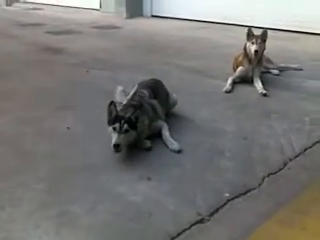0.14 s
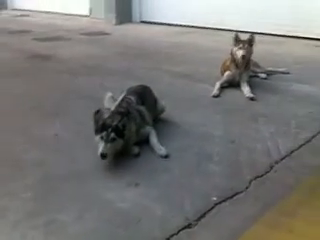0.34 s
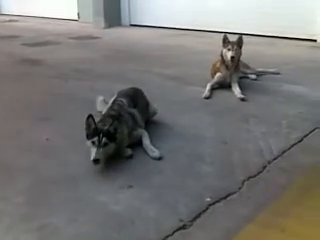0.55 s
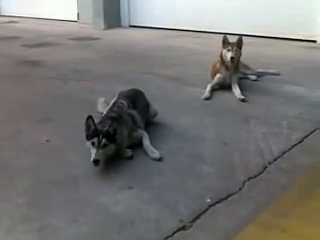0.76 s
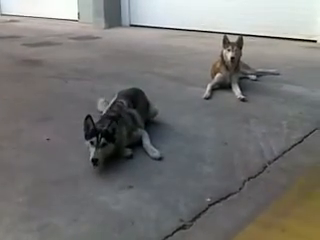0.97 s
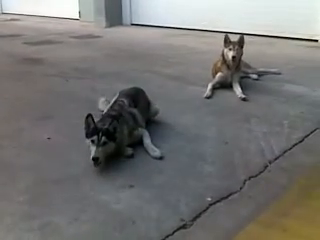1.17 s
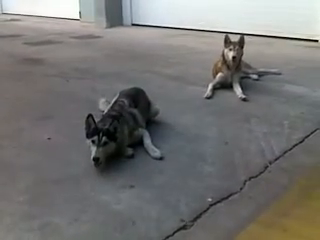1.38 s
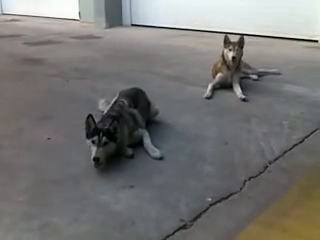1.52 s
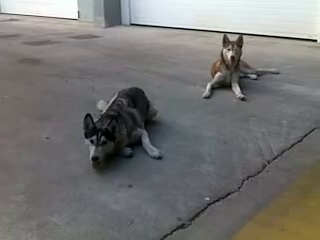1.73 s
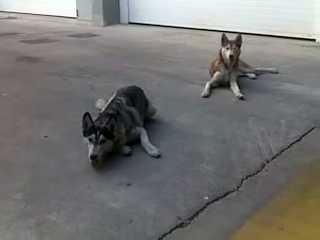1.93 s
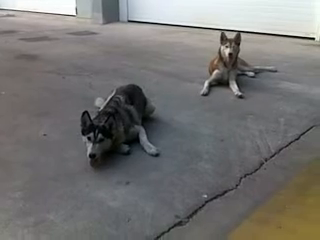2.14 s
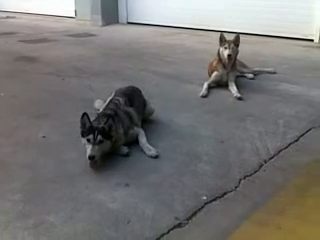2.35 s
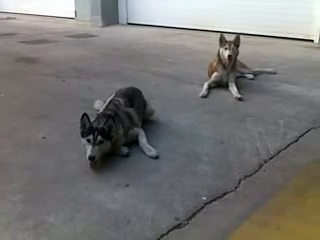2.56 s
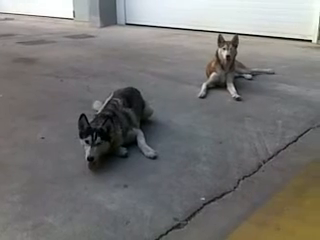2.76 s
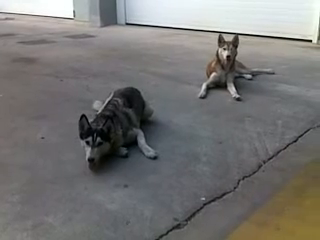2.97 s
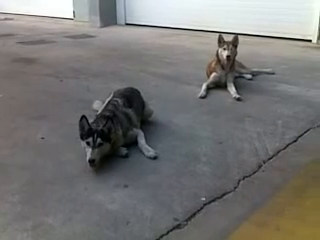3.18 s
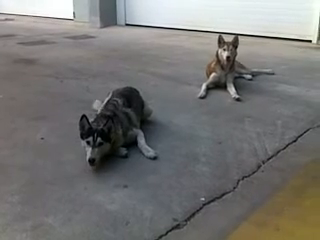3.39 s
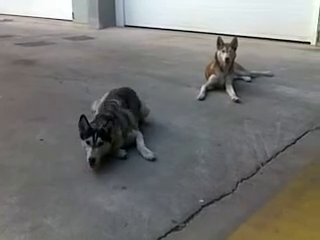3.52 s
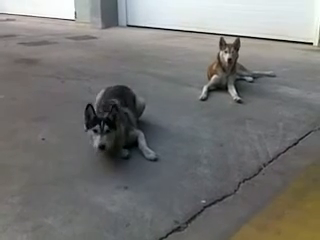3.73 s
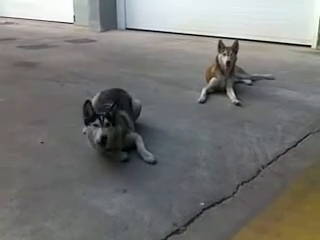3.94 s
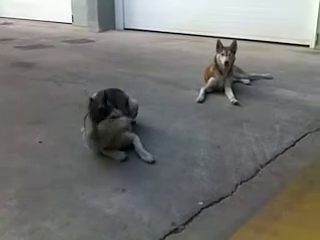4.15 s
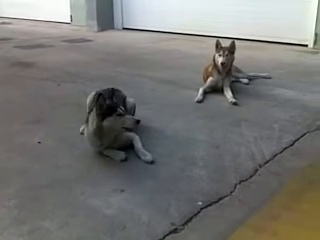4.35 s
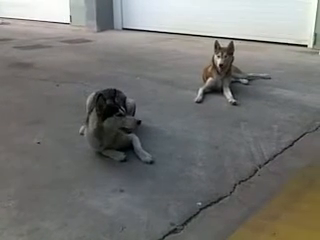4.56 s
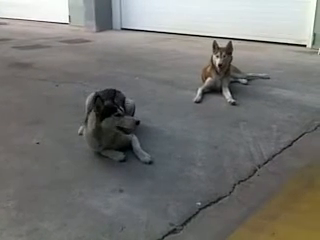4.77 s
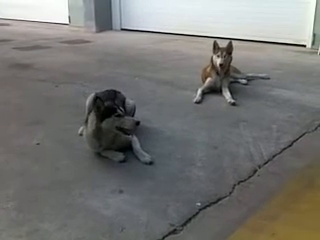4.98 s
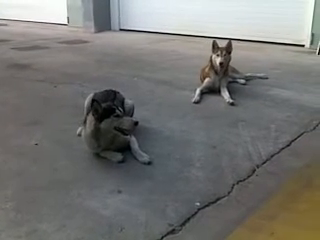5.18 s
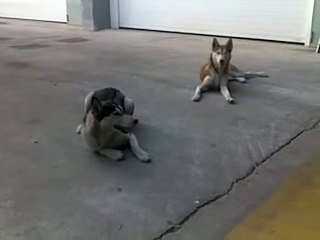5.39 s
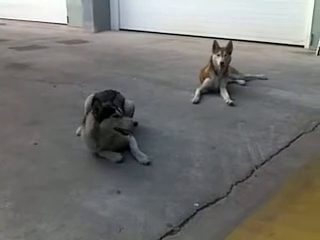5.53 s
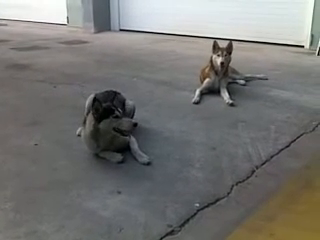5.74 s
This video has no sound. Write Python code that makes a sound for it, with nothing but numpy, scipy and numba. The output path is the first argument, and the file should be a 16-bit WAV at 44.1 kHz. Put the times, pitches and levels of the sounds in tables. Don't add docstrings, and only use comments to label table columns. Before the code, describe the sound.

Phone-quality sound of two husky-like dogs in a walled concrete yard: constant midrange motor hum with airy hiss, a single short bright yelp near the start, a long pause, then a rough, breathy bark with rumbling, fizzing distortion running straight into a brief arched yelp. Doors throw back quick slaps and about a second of tail; background dips slightly after barks.

```python
import sys
import numpy as np
from scipy import signal
from scipy.fft import rfft, irfft, next_fast_len
from scipy.io import wavfile
from scipy.ndimage import uniform_filter1d
from numba import njit

SR = 44100
rng = np.random.default_rng(int(sys.argv[2]) if len(sys.argv) > 2 else 0)


def store_wav(level_fs):
    pcm = np.round(np.clip(np.atleast_2d(level_fs), -1, 1) * 32767)
    wavfile.write(sys.argv[1], SR, pcm.T.astype(np.int16))


def volts(x):
    e = np.asarray(x, float) / 20
    return 10 ** e


N = 256220

# f/Hz, level/dB (density)
HISS = [(413, -12.5), (477, -11), (634, -15.5), (1010, -16), (1400, -19), (2150, -26.5), (3160, -26),
        (3570, -32.5)]
# f/Hz, level/dB
HISS_EDGES = [(18, -63.5), (30, -33), (138, -24.5), (203, -9), (413, 0), (3570, 0), (3870, -15),
              (5030, -60)]
HISS_DB = -32
# f/Hz, level/dB
HUM = [(339, -41.5), (475.7, -28.5), (523.6, -36.5), (716.3, -45.5), (977, -46), (1025, -47),
       (1379.5, -42.5), (1428, -49), (1572, -56.5), (1809, -54.5), (1879, -51), (2444, -56.5), (3090, -56)]

# t/s, level/dB (effort), f/Hz (pitch)
YELP = [
    (.52, -35.5, 251.3),
    (.553, -15.5, 295.2),
    (.612, -6.5, 418.3),
    (.632, -8, 451.7),
    (.65, -5.5, 469.5),
    (.674, -4.5, 455.6),
    (.686, -18, 410),
    (.701, -12, 341),
    (.722, -21, 285),
]
HOARSE = [
    (3.62, -28, 281),
    (3.627, -18, 309.5),
    (3.657, -16, 515.6),
    (3.688, -13, 543.8),
    (3.71, -15.5, 608.4),
    (3.8, -10.5, 595),
    (3.92, -9, 563.6),
    (3.985, -25.5, 541.5),
    (4.05, -18, 552),
]
ARCH = [
    (4.055, -23.5, 337.8),
    (4.085, -17.5, 398.4),
    (4.11, -20, 428.7),
    (4.14, -13, 462.7),
    (4.165, -17, 435.6),
    (4.2, -20.5, 335.1),
    (4.22, -24.5, 319.5),
    (4.28, -25, 269.8),
    (4.32, -28.5, 302),
]
# f/Hz, width/Hz, level/dB
CLEAR_THROAT = [(410, 110, 4), (644, 160, 4), (918, 110, 3.5), (1180, 330, -2.5), (1801, 290, -5.5),
                (2207, 190, -9.5), (2650, 600, -21.5)]
HOARSE_THROAT = [(585, 270, 0), (870, 230, -3), (1290, 350, -4), (1860, 320, -4), (2170, 260, -6),
                 (2600, 300, -10)]
ARCH_THROAT = [(446, 190, 1.5), (684, 190, 0.5), (916, 130, 4.5), (1253, 190, -4), (1779, 360, 1),
               (2420, 240, -11), (2765, 430, -9.5)]
SHUT_HZ, OPEN_HZ = 285, 328
CALM_ROUGH, SOFT_ROUGH, HOARSE_ROUGH = .04, .12, .35
STRAIN_HZ, BROKEN_HZ, BROKEN_ROUGH = 520, 595, .88
ROUGH_BRIGHT_DB_PER_OCT = 5.5
VOICE_TOP_HZ, PUFF_LOW_HZ, PUFF_HIGH_HZ = 3050, 480, 5000

# f/Hz, t60/s
YARD = [(200, 0.41), (500, 1), (1000, 0.99), (2000, 0.94), (3500, 0.94)]
# delay/s, level/dB
WALLS = [
    (.012, -8.5),
    (.035, -5),
    (.075, -17.5),
    (.1, -13.5),
    (0.149, -20),
    (.23, -24),
]
# f/Hz, level/dB
YARD_COLOUR = [(250, -6), (460, -1), (930, -4.5), (1400, -0.5), (1900, 0), (2400, 0.5), (3200, 2)]

# t/s, level/dB
NUDGES = [
    (.615, -36),
    (4.132, -35),
]
NUDGE_S, NUDGE_HZ = .012, 150
RASP_S, RASP_HZ, RASP_WIDTH_HZ, RASP_DB = .033, 2340, 700, -14.5
BLAST_AT_S, SWELL_S, HOLD_S, DIE_S, SWELL_DB = 3.62, .04, .22, .17, -19.5
RUMBLE_DB, RUMBLE_DB_PER_S, RUMBLE_DIE_DB = -19.5, -26, -36
FIZZ_DB, FIZZ_DB_PER_S, FIZZ_DIE_DB = -26.5, 21.5, -21.5

PHONE_HZ = 8000
# f/Hz, level/dB
BAND = [(3000, 0.5), (3600, 1), (4000, 1.5), (4350, -58), (5000, -84)]
# f/Hz, level/dB
MIRRORS = [
    [(4200, -61), (5000, -60.5), (6500, -57), (7600, -59), (8100, -101)],
    [(12500, -83), (13300, -63), (14200, -48.5), (14700, -93.5)],
]
# f/Hz, level/dB
SPLATTER = [(3000, 5), (3800, -15.5), (4300, -7), (7500, -19), (9500, -46), (11000, -92)]
# start/s, end/s
BURSTS = [
    (.605, .63),
    (3.625, 3.69),
    (3.74, 3.79),
    (3.805, 3.83),
]


def evened(x):
    return x / np.sqrt(np.mean(x ** 2) + 1e-20)


def read(points, hz):
    f, value = np.transpose(points)
    return np.interp(np.log(hz + 1), np.log(f + 1), value)


def colour(x, points):
    size = next_fast_len(N)
    gain = volts(read(points, np.fft.rfftfreq(size, 1 / SR)))
    return irfft(rfft(x, size) * gain, size)[:N]


def drift(count, smooth_s):
    size = max(round(smooth_s * SR), 2)
    once = uniform_filter1d(rng.standard_normal(count), size)
    return evened(uniform_filter1d(once, size))


def resonate(x, hz, width_hz):
    turn = np.exp(2j * np.pi * np.cumsum(hz) / SR)
    r = np.exp(-np.pi * width_hz / SR)
    smooth = signal.lfilter([(1 - r) ** 2], [1, -2 * r, r ** 2], x / turn)
    return 2 * (turn * smooth).real


def hiss():
    frames, hz = N // 256 + 5, np.fft.rfftfreq(1024, 1 / SR)
    a, b, patches = rng.standard_normal((frames, 513, 3)).T
    patches = uniform_filter1d(uniform_filter1d(patches, 10, axis=0), 10, axis=1)
    level_db = (read(HISS, hz) + read(HISS_EDGES, hz))[:, None] + 0.91 * evened(patches)
    air = signal.istft((a + 1j * b) * volts(level_db), nperseg=1024, noverlap=768)[1][:N]
    return volts(HISS_DB + 1.5) * evened(air)


def hum():
    turns = np.cumsum(1 + .0012 * drift(N, 0.13)) / SR
    out = np.zeros(N)
    for hz, db in HUM:
        waver_db = np.clip(-.12 * (db + 25.0), 0, 6) * drift(N, 0.042)
        tone = np.sin(2 * np.pi * (hz * turns + rng.random()))
        out += np.sqrt(2) * volts(db + waver_db) * tone
    return out


def bark(rows, throat, calm, shut_db, open_db):
    s, *columns = np.transpose(rows)
    t = np.arange(s[0], s[-1], 1 / SR)
    effort_db, hz = (np.interp(t, s, c) for c in columns)
    rough = np.clip(np.interp(hz, [STRAIN_HZ, BROKEN_HZ], [calm, BROKEN_ROUGH]), 0, 1)
    bright_db_per_oct = np.interp(hz, [SHUT_HZ, OPEN_HZ], [shut_db, open_db])
    bright_db_per_oct = bright_db_per_oct + ROUGH_BRIGHT_DB_PER_OCT * rough

    turns = np.cumsum(hz * (1 + 0.11 * rough * drift(len(t), 0.0034))) / SR
    folds = sum(np.cos(2 * np.pi * k * turns) for k in range(1, 15))
    folds *= volts(4.5 * rough * drift(len(t), .002))
    puffs = (0.37 + np.exp(-(turns % 1) / 0.3)) * rng.standard_normal(len(t))
    puffs = signal.lfilter(*signal.butter(2, (PUFF_LOW_HZ, PUFF_HIGH_HZ), "band", fs=SR), puffs)
    drive = np.sqrt(1 - rough ** 2) * evened(folds) + rough * evened(puffs)

    voice = np.zeros(len(t))
    for k, (f, width_hz, db) in enumerate(throat):
        shaken_hz = f * (1 + 0.025 * rough * drift(len(t), 0.014))
        gain = (-1) ** k * volts(db + bright_db_per_oct * np.log2(f / 900))
        voice += gain * resonate(drive, shaken_hz, width_hz)
    voice = signal.sosfilt(signal.butter(6, VOICE_TOP_HZ, fs=SR, output="sos"), voice)
    loudness = np.sqrt(uniform_filter1d(voice ** 2, 1200) + 1e-9)
    out, start = np.zeros(N), round(s[0] * SR)
    out[start:start + len(t)] = volts(effort_db) * voice / loudness * signal.windows.tukey(len(t), .04)
    return out


def yard(x, tail_db):
    taps = np.zeros(SR)
    at = np.arange(2400, SR - 20, 20)
    taps[at + rng.integers(0, 20, len(at))] = rng.choice([-1., 1.], len(at))
    hz, t, z = signal.stft(taps, SR, nperseg=256)
    decay = volts(-60 * t / read(YARD, hz)[:, None])
    tail = signal.istft(z * decay, SR, nperseg=256)[1]
    tail = volts(tail_db) * tail / np.linalg.norm(tail)
    for delay_s, db in WALLS:
        tail[round(delay_s * SR)] += volts(db)
    return x + colour(signal.fftconvolve(x, tail)[:N], YARD_COLOUR)


def nudges():
    t = np.arange(N) / SR
    air = evened(signal.lfilter(*signal.butter(2, NUDGE_HZ, fs=SR), rng.standard_normal(N)))
    return air * sum(volts(db) * np.exp(-((t - s) / NUDGE_S) ** 2) for s, db in NUDGES)


def rasp():
    t = np.arange(N) / SR - BLAST_AT_S
    air = evened(resonate(rng.standard_normal(N), np.full(N, RASP_HZ), RASP_WIDTH_HZ))
    return volts(RASP_DB) * air * np.interp(t, [0, .006, RASP_S, RASP_S + .008], [0, 1, 1, 0])


def blast():
    t = np.arange(N) / SR - BLAST_AT_S
    corners_s = np.cumsum([0, SWELL_S, HOLD_S, DIE_S])
    shape_db = np.interp(t, corners_s, [SWELL_DB, 0, 0, 0], -120, -120)
    dying = np.clip((t - SWELL_S - HOLD_S) / DIE_S, 0, 1)
    held_s = np.clip(t - SWELL_S, 0, HOLD_S)
    low, high = rng.standard_normal((2, N))
    low = evened(colour(low, [(20, -0.5), (60, -1.5), (130, -2.5), (250, 0), (380, 0.0),
                              (550, -25.0), (900, -72.5)]))
    high = evened(colour(high, [(1500, -60.0), (2800, 4.0), (3200, 5.5), (4200, -11), (6000, -39.5)]))
    rumble = volts(RUMBLE_DB + RUMBLE_DB_PER_S * held_s + RUMBLE_DIE_DB * dying) * low
    fizz = volts(FIZZ_DB + FIZZ_DB_PER_S * held_s + FIZZ_DIE_DB * dying) * high
    return volts(shape_db) * (rumble + fizz)


def scene():
    yelp = volts(-1.0) * bark(YELP, CLEAR_THROAT, CALM_ROUGH, shut_db=-13, open_db=2.0)
    hoarse = volts(6.5) * bark(HOARSE, HOARSE_THROAT, HOARSE_ROUGH, shut_db=-4, open_db=-5)
    arch = volts(7.0) * bark(ARCH, ARCH_THROAT, SOFT_ROUGH, shut_db=-12.5, open_db=1.0)
    dogs = yard(yelp + hoarse + arch, tail_db=-5.0)
    return (hiss() + hum() + dogs + nudges() + rasp() + blast())[None]


@njit
def follow(over_db, fall, recover):
    out, now = np.empty_like(over_db), 0.
    for i in range(len(over_db)):
        now += (over_db[i] - now) * (fall if over_db[i] > now else recover)
        out[i] = now
    return out


def overload(x, top):
    return top * x / (top ** 6 + x ** 6) ** (1 / 6)


def flicker(x, kept):
    t = np.arange(N) / SR
    blocks = np.repeat(rng.random((2, N // 1024 + 1)) < kept, 1024, axis=1)[:, :N]
    bursts = sum((t > start) & (t < end) for start, end in BURSTS)
    bands_hz = (4300, 6900), (6900, 11000), (11000, 15000)
    for on, band_hz in zip((bursts, *blocks), bands_hz):
        top = signal.sosfiltfilt(signal.butter(8, band_hz, "band", fs=SR, output="sos"), x)
        x = x - top * uniform_filter1d(1. - on, 400)
    return x


def roll_off(x):
    return signal.sosfilt(signal.butter(12, 14400, fs=SR, output="sos"), x)


def record(dry):
    level_db = 10 * np.log10(abs(uniform_filter1d(dry[0] ** 2, 400)) + 1e-12)
    over_db = 0.59 * np.maximum(level_db + 26, 0)
    cut_db = follow(over_db, 1 / (.12 * SR), 1 / (.75 * SR))
    x = dry[0] / volts(cut_db)
    x = x + 0.13 * x ** 2
    x = signal.lfilter(*signal.butter(1, 15, "high", fs=SR), x)
    x = overload(x, .68)
    x = signal.lfilter(*signal.butter(4, 3900, fs=SR), x)
    x = overload(x, .64)
    x = colour(x, BAND)
    t = np.arange(N) / SR
    images = sum(colour(2 * x * np.cos(2 * np.pi * (k + 1) * PHONE_HZ * t), mirror)
                 for k, mirror in enumerate(MIRRORS))
    x = x + images
    x = x + colour(np.clip(x, -.55, .55) - x, SPLATTER)
    mix = flicker(x, kept=.6)[None]
    return roll_off(mix)


dry = scene()
out = record(dry)
store_wav(out)
```